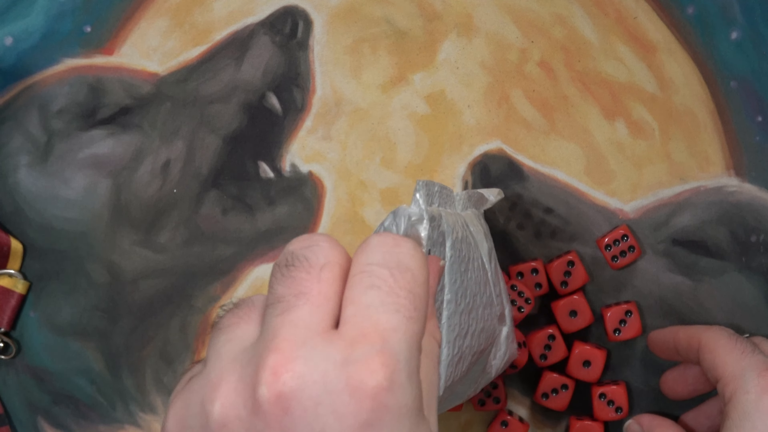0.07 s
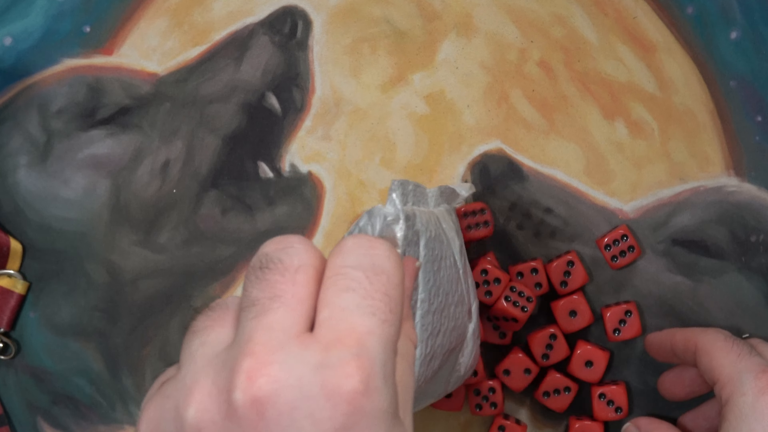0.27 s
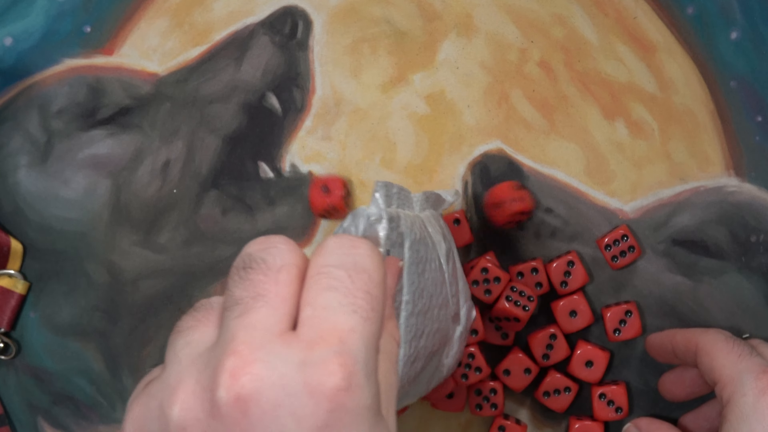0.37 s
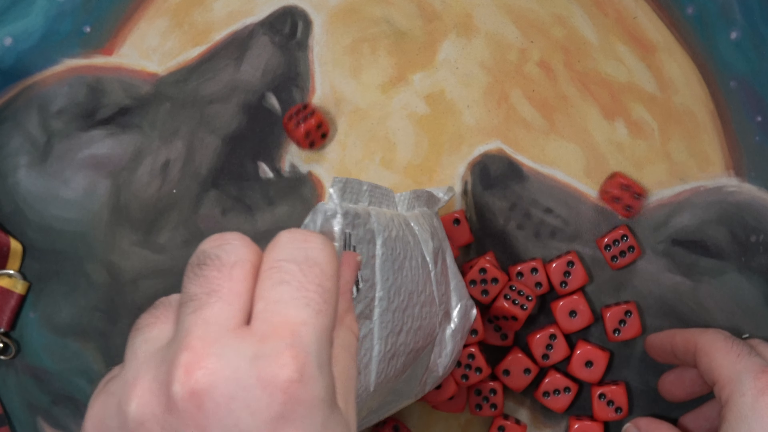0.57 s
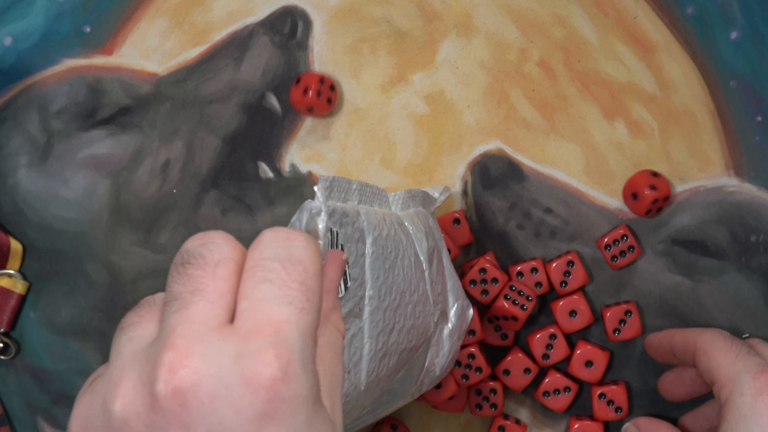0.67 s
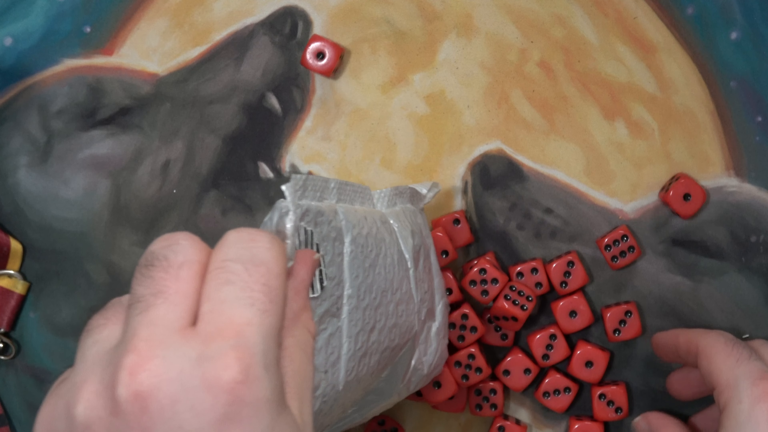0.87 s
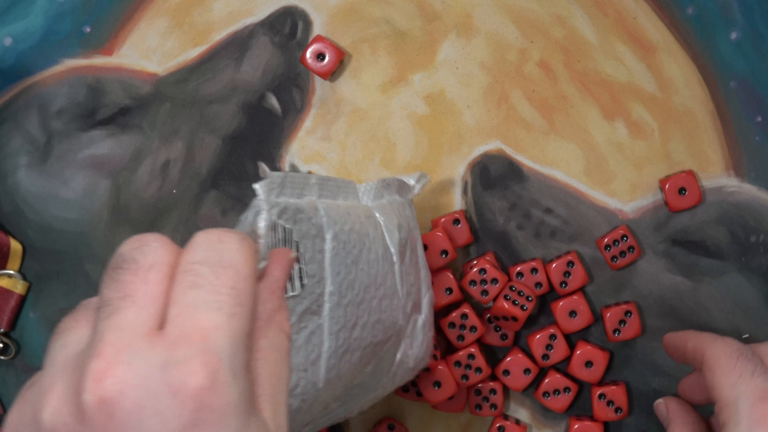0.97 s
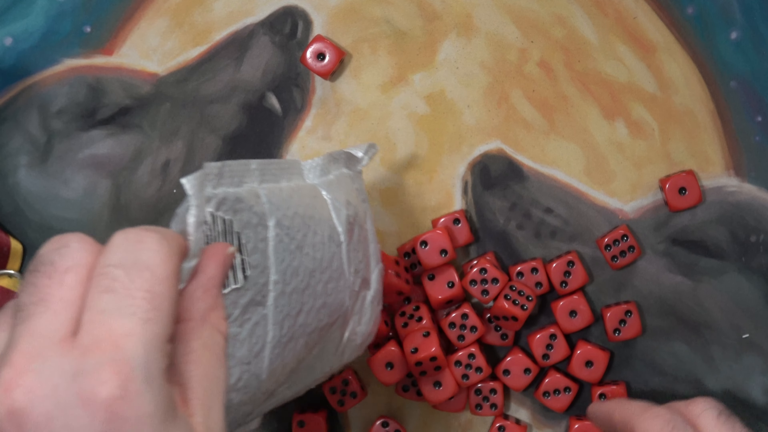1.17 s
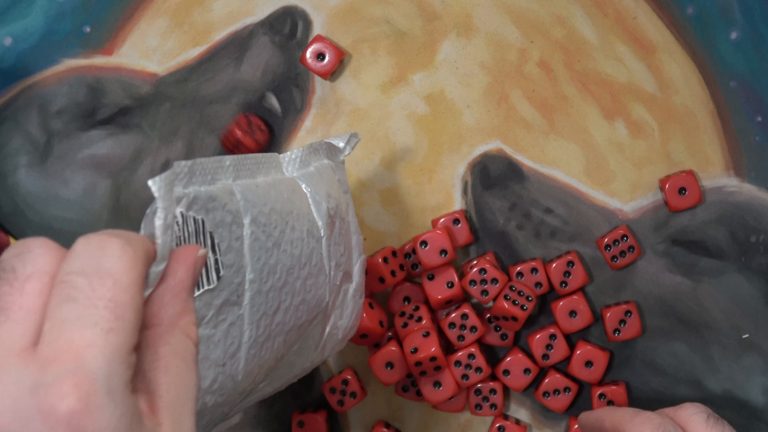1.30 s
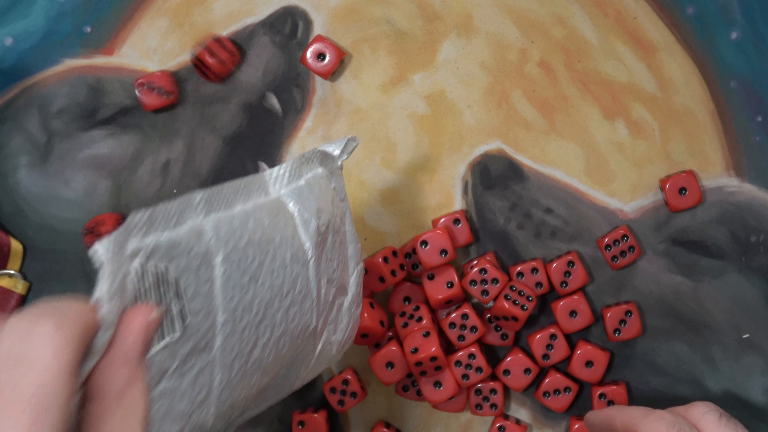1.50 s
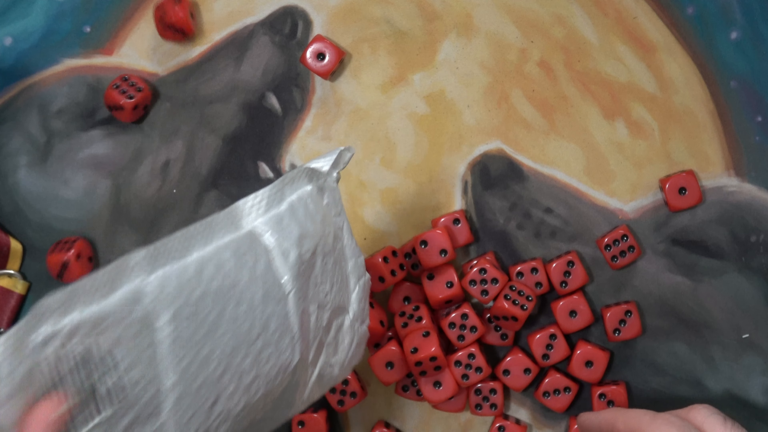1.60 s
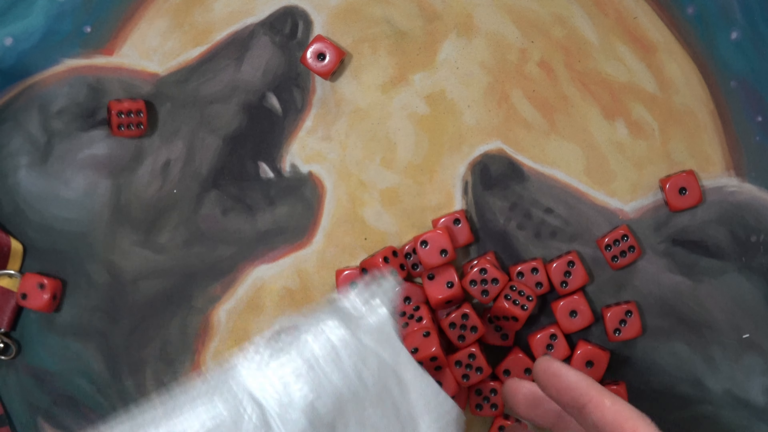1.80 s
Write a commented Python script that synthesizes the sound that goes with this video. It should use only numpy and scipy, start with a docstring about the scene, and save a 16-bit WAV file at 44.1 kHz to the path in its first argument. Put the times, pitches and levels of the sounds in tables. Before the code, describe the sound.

Dice tumble onto a tabletop mat with clacks and soft thuds as a plastic bag crinkles.

```python
"""Dice are shaken out of a padded plastic bag onto a mat on a table, close up in a small room.
They clack against each other, bright clicks with a faint ring, in one rush and then one by one.
Each landing and tumble on the mat is a soft thud that rings the table, with a knock from a die's corner.
The bag rustles as it flexes; as it is lifted away its creases snap and its wall buckles with hollow pops."""
import sys
import numpy as np
from scipy import signal
from scipy.fft import rfft, irfft
from scipy.io import wavfile
from scipy.ndimage import uniform_filter1d

SR = 44100
rng = np.random.default_rng(int(sys.argv[2]) if len(sys.argv) > 2 else 0)


def wrap_up_sound(samples):
    """Save the sound to the file named by the first command line argument, as 16-bit audio."""
    columns = np.atleast_2d(samples).T
    # keep every value between -1 and 1, then stretch to whole-number steps
    tamed = np.clip(columns, -1, 1)
    steps = np.round(tamed * 32767).astype(np.int16)
    wavfile.write(sys.argv[1], SR, steps)


N = 81585

# Tone of a hard plastic click, for dice and bag alike (frequency [Hz], gain [dB])
CLICK_TONE = [(300, -8), (1000, -6.5), (1900, -2.5), (2800, 4), (5000, 2), (7800, -2.5), (10000, -12.5),
              (13000, -25), (16000, -73)]


def amp(db):
    """Decibels to gain."""
    return 10 ** (np.asarray(db) / 20)


def unit(x):
    """Scales to rms 1."""
    return x / np.sqrt(np.mean(x ** 2) + 1e-20)


def crest(x, size):
    """Scales so that the loudest stretch of size samples has envelope 1."""
    return x / np.sqrt(2 * uniform_filter1d(x ** 2, size, mode="constant").max() + 1e-20)


def read(points, hz):
    """Reads a table on a log-frequency axis."""
    f, value = np.transpose(points)
    return np.interp(np.log(hz + 1), np.log(f + 1), value)


def add(mix, s, sound):
    """Adds a sound into the mix at s seconds."""
    part = mix[max(round(s * SR), 0):][:len(sound)]
    part += sound[:len(part)]


def colour(x, db_at):
    """Minimum-phase EQ whose gain in dB is the function db_at(Hz)."""
    hz = abs(np.fft.fftfreq(2048, 1 / SR)) + 1
    log_gain = np.log(amp(np.maximum(db_at(hz), -90)))
    response = np.exp(np.conj(signal.hilbert(log_gain)))
    taps = np.fft.ifft(response).real[:len(hz) // 2]
    return signal.fftconvolve(x, taps)[:len(x)]


def hump(hz, centre_hz, octaves):
    """Gain in dB of a broad resonant peak."""
    return -20 * np.log10(1 + (np.log2(hz / centre_hz) / octaves) ** 2 / 2)


def burst(decay_s, spike):
    """One sharp contact followed by a quickly dying chatter."""
    t = np.arange(4096) / SR
    x = rng.standard_normal(len(t)) * np.exp(-t / decay_s)
    x[0] = spike
    return x


def ring(modes):
    """Rings the modes at random strengths, as if each blow landed on a different spot."""
    t = np.arange(SR // 4) / SR
    return sum(rng.standard_normal() * amp(db - 60 * t / t60) * np.sin(2 * np.pi * hz * t)
               for hz, db, t60 in modes)


def grains(tone, curve, per_s, spread_db=1.5):
    """A random run of small contacts of uneven size under a level curve."""
    sizes = amp(spread_db * np.minimum(rng.exponential(1, N), 3))
    ticks = sizes * rng.choice([-1, 1], N) * (rng.random(N) < per_s / SR)
    envelope = amp(np.interp(np.arange(N) / SR, *np.transpose(curve)))
    return unit(colour(ticks, lambda hz: read(tone, hz))) * envelope


def dice_rattle():
    """Dice jostle in the bag and the heap: a fine spray of tiny clicks."""
    # Swell of the rattle (time [s], level [dB])
    swell = [(0, -37), (.069, -53.5), (0.161, -47.5), (.23, -36.5), (.335, -36.5), (.37, -33), (.45, -31.5),
             (.51, -40.5), (.65, -59.5), (.73, -43), (.81, -67), (.87, -49), (.96, -60.5), (1.27, -53.5),
             (1.41, -63), (1.46, -66), (1.62, -82)]
    return grains(CLICK_TONE, swell, per_s=1000)


def dice_clacks():
    """Hard dice meet: a bright click and a faint ring."""
    # Die against die (time [s], level [dB], tilt above 1 kHz [dB/octave])
    hits = [(.012, -29.5, 13), (0.0837, -32, -2.5), (.178, -26, 6), (.19, -21, 0.5), (0.2126, -17.5, -4.5),
            (0.2218, -19.5, -0.5), (0.2246, -13.5, 5), (0.2894, -11, 3.5), (0.2997, -13.5, 10),
            (.303, -19, 2), (0.344, -17, 12), (0.3532, -7, 3), (.364, -6.5, 1), (0.3678, -11, 0.5),
            (0.3681, -13.5, 4), (0.3745, -15, 12), (0.3796, -13.5, 7.5), (.388, -15.5, 15), (.395, -15, 9),
            (.4212, -8, 6), (0.4271, -11.5, 8), (0.4366, -18, 8), (0.4487, -13, 6.5), (.461, -24, 11),
            (0.4669, -12, 8), (.567, -18, 3.5), (0.604, -23.5, 7), (0.6739, -19, -2), (.687, -27, 1),
            (0.7153, -22.5, -2.5), (0.7282, -25, 10), (.7428, -23, -3), (.787, -32.5, .5),
            (1.2552, -21.5, -4), (1.756, -45, -2.5), (1.2796, -28.5, -2.5)]
    # Modes of a die (frequency [Hz], level [dB], t60 [s])
    die_modes = [(2814, 1.5, 0.12), (3830, -1, .1), (4660, -1.2, .08), (4860, -0.37, 0.07), (5670, -1, .05),
                 (6450, 0, .06)]
    out = np.zeros(N)
    for s, db, tilt in hits:
        click = colour(burst(decay_s=0.0025, spike=4.96),
                       lambda f: read(CLICK_TONE, f) + tilt * np.log2(np.maximum(f, 1000) / 5000))
        add(out, s, amp(db - 1.5) * crest(click, size=24))
        add(out, s, amp(db - 24.5) * crest(ring(die_modes), size=200))
    return out


def mat_thuds():
    """The mat softens each landing to a low push that rings the table; a die's corner adds a knock."""
    # Dice landing on the mat (time [s], thud level [dB], pitch [Hz], knock level [dB])
    landings = [(0.019, -30.5, 155, -49), (0.104, -22.5, 172, -30.5), (0.178, -25.5, 190, -29),
                (0.214, -20.5, 380, -23.5), (0.227, -20.5, 166, -23.5), (.247, -23, 178, -23.5),
                (0.285, -19, 226, -27.5), (.304, -19.5, 172, -29), (0.328, -23.5, 168, -45),
                (0.366, -19.5, 173, -34), (.379, -31, 143, -23), (.388, -9, 187, -31),
                (0.434, -16.5, 198, -20), (0.448, -13.5, 164, -23.5), (.475, -14, 161, -23.5),
                (.485, -18.5, 306, -39), (0.508, -14.5, 156, -26), (.548, -15, 162, -21),
                (.604, -19.5, 244, -22), (0.616, -20, 228, -26), (.673, -17, 154, -21),
                (0.719, -16.5, 205, -26), (0.73, -24, 153, -28), (0.763, -19, 278, -32.5),
                (0.791, -22, 195, -31), (.805, -18.5, 214, -46), (.845, -20, 263, -40),
                (1.126, -22.5, 176, -31), (1.146, -16.5, 246.5, -23.5), (1.189, -23.5, 235, -28.5),
                (1.214, -15.5, 175, -31.5), (1.243, -19.5, 230, -31), (1.261, -24.5, 233, -24.5),
                (1.288, -14, 218, -25), (1.346, -16.5, 229, -26), (1.4035, -17.5, 198.4, -32.5),
                (1.455, -19.5, 207, -39), (1.482, -19.5, 229, -25), (1.532, -18, 198, -37),
                (1.561, -15, 213, -23), (1.605, -25.5, 215, -52), (1.756, -28.5, 194, -37)]
    # Modes of the tabletop (frequency [Hz], level [dB], t60 [s])
    table_modes = [(112, -3.5, 0.49), (154.3, -1, 0.35), (216.8, -2, .36), (290.3, -0.5, 0.37),
                   (431.2, 2.5, 0.077), (528, -5.5, 0.25)]
    # Dull tone of a corner's knock (frequency [Hz], gain [dB])
    knock_tone = [(120, -30), (300, 3), (580, 0.5), (900, -17.5), (3000, -46.5), (12000, -84)]
    rise_s, decay_s, low_cut_hz = 0.003, 0.0068, 93.3
    out, t = np.zeros(N), np.arange(SR // 8) / SR
    envelope = (1 - np.exp(-(t / rise_s) ** 2)) * np.exp(-t / decay_s)
    for s, db, hz, knock_db in landings:
        push = -np.sin(2 * np.pi * hz * t) * envelope
        knock = colour(burst(decay_s, spike=6.1), lambda f: read(knock_tone, f))
        # Modes near the thud's pitch are driven hardest.
        modes = [(f, mode_db + hump(f, hz, octaves=1), t60) for f, mode_db, t60 in table_modes]
        add(out, s, amp(db - 3.5) * crest(push, size=130))
        add(out, s, amp(knock_db) * crest(knock, size=130))
        add(out, s, amp(db - 12.5) * crest(ring(modes), size=130))
    return signal.sosfilt(signal.butter(5, low_cut_hz, "high", fs=SR, output="sos"), out)


def bag_rustle():
    """The padded bag flexes in the hand: a low, grainy rustle."""
    # Swell of the rustle (time [s], level [dB])
    swell = [(0.151, -45.5), (.23, -40.5), (.39, -27), (.52, -40), (0.819, -47.5), (.87, -35.5),
             (0.951, -37), (1.08, -37.5), (1.33, -39), (1.421, -51), (1.47, -34.5), (1.57, -42),
             (1.64, -57)]
    # Muffled tone of the bag (frequency [Hz], gain [dB])
    tone = [(65, -38), (115, 1.5), (220, 9.5), (400, -1.5), (900, -3), (1400, -13.5), (2200, -17.5),
            (7000, -34), (15000, -62)]
    return grains(tone, swell, per_s=700)


def bag_pops():
    """The bag's wall buckles with a hollow pop and a crack."""
    # Buckles (time [s], pop level [dB], cutoff [Hz], pop decay [s], crack level relative to pop [dB])
    buckles = [(0.2267, -25, 1000, 0.0027, -22), (0.343, -24, 1500, 0.0065, -24),
               (0.3823, -8.5, 1064, 0.0019, -28), (0.8441, -10.5, 1010, 0.002, -15),
               (.857, -19.5, 860, 0.0068, -12.5), (.8695, -17, 980, 0.0028, -36),
               (0.89, -19.5, 1050, 0.0028, -18), (.899, -19.5, 1200, .003, -21),
               (0.991, -26, 1320, 0.014, -8.5), (1.009, -25, 1310, 0.0077, -18),
               (1.13, -25, 1570, 0.012, -8.5), (1.228, -30, 1500, 0.011, -9.5),
               (1.3313, -27.5, 1500, 0.023, -15), (1.4463, -19, 2010, 0.0048, -12.5),
               (1.46, -28, 1760, 0.0087, -22), (1.5113, -21.5, 1700, 0.0042, -12.5),
               (1.557, -31.5, 1650, 0.011, -15)]
    # Hollow tone of a pop (frequency [Hz], gain [dB])
    tone = [(50, -50), (230, -6), (550, -3), (900, -1), (2000, -8)]
    rolloff_db_per_octave = 35.5
    out = np.zeros(N)
    for s, db, cutoff_hz, decay_s, crack_db in buckles:
        pop = colour(burst(decay_s, spike=5.5),
                     lambda f: read(tone, f) - rolloff_db_per_octave * np.log2(np.maximum(f / cutoff_hz, 1)))
        crack = colour(burst(decay_s=0.01, spike=6.15), lambda f: 0.8 * read(CLICK_TONE, f))
        add(out, s, amp(db - 1) * crest(pop, size=50))
        add(out, s, amp(db + crack_db) * crest(crack, size=24))
    return out


def crease_snaps():
    """Creases in the plastic snap with short, bright ticks."""
    # Snapping creases (time [s], level [dB], centre [Hz])
    creases = [(0.2361, -8.5, 8200), (0.2465, -11, 10100), (1.026, -23.5, 5300), (1.03, -27, 4500),
               (1.1005, -18, 6500), (1.109, -25, 5700), (1.7423, -39.5, 5400)]
    out = np.zeros(N)
    for s, db, hz in creases:
        snap = colour(burst(decay_s=0.0013, spike=3.3),
                      lambda f: hump(f, hz, octaves=0.6) + 0.48 * read(CLICK_TONE, f))
        add(out, s, amp(db - 2) * crest(snap, size=24))
    return out


def room_tone():
    """A quiet, steady bed of low noise."""
    # Tone of the room's noise (frequency [Hz], gain [dB])
    tone = [(25, -7.5), (70, -10), (120, 6), (200, -7), (400, -18), (1100, -10.5), (1800, -31), (9000, -29),
            (15000, -35)]
    return amp(-54) * unit(colour(rng.standard_normal(N), lambda hz: read(tone, hz)))


def reflections(x, onset_s):
    """Dense small-room reverb; three tails crossfade steadily to keep ringing tones out of the decay."""
    # Decay of the room (frequency [Hz], t60 [s])
    decay = [(120, 0.03), (350, 0.37), (1000, 0.15), (4000, 0.2844), (8000, 0.19), (14000, 0.3)]
    # Reverb return (frequency [Hz], level [dB])
    return_eq = [(100, -10.5), (300, -5.5), (1000, -4.5), (4000, -3), (12000, -5.5)]
    crossfade_s = 0.06
    out, rotation = np.zeros(N), np.arange(N) / SR / crossfade_s
    for k in range(3):
        hz, t, bands = signal.stft(rng.standard_normal(SR // 2), SR, nperseg=256)
        t60 = read(decay, hz)[:, None]
        envelope = amp(read(return_eq, hz)[:, None] - 60 * t / t60)
        equal_energy = np.sqrt(2 * np.log(1000) / (t60 * SR))
        tail = signal.istft(bands * envelope * equal_energy, SR, nperseg=256)[1]
        fade_in = np.minimum(np.arange(len(tail)) / SR / onset_s, 1)
        send = np.cos(np.pi * (rotation + k / 3)) * np.sqrt(2 / 3)
        out += signal.fftconvolve(x * send, tail * fade_in)[:N]
    return out


def scene():
    """Dice and bag in the middle, with the room around them."""
    # Stereo width of the reverb (frequency [Hz], side gain [dB])
    width = [(100, -26), (1100, -10.5), (2200, -50), (4500, -14), (8000, -1.5), (14000, -5.5)]
    near = dice_clacks() + mat_thuds() + crease_snaps() + bag_pops() + dice_rattle() + bag_rustle()
    mid = near + reflections(near, onset_s=0.0083) + room_tone()
    side = colour(reflections(near, onset_s=0.00068), lambda hz: read(width, hz))
    side += amp(-9) * room_tone()
    return np.array([mid + side, mid - side])


def record(dry):
    """The microphone leans left in the bass and cuts the extreme treble."""
    # Stereo balance (frequency [Hz], left minus right [dB])
    balance = [(70, 6), (140, 7), (280, 5.5), (550, 2), (1100, 1), (2200, -0.5)]
    cutoff_hz = 16200
    hz = np.fft.rfftfreq(2 * N, 1 / SR)
    lean = amp(read(balance, hz))
    pan = 2 * np.array([lean, np.ones(len(hz))]) / (1 + lean)
    panned = irfft(rfft(dry, 2 * N) * pan)[:, :N]
    lowpass = signal.firwin(511, cutoff_hz, window=("kaiser", 9), fs=SR)
    return signal.oaconvolve(panned, lowpass[None], "same")


dry = scene()
out = record(dry)
wrap_up_sound(out)
```